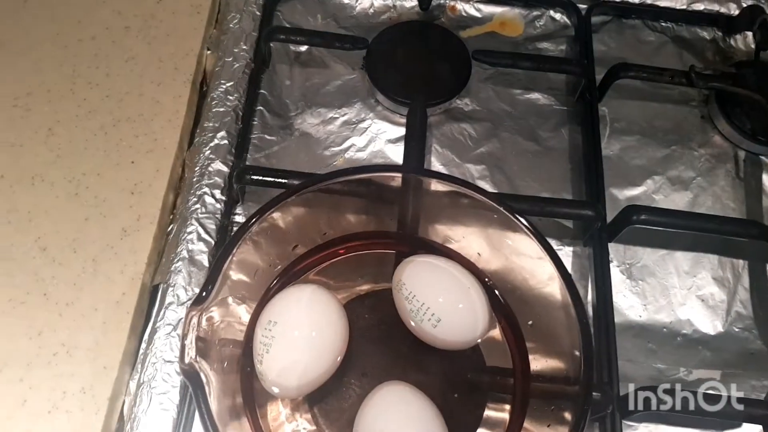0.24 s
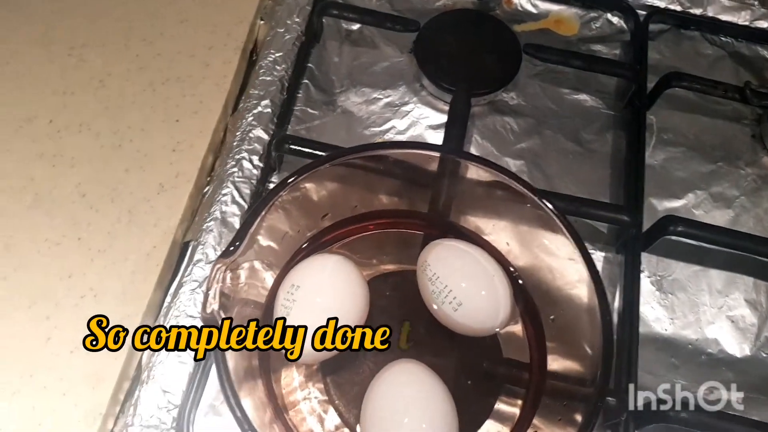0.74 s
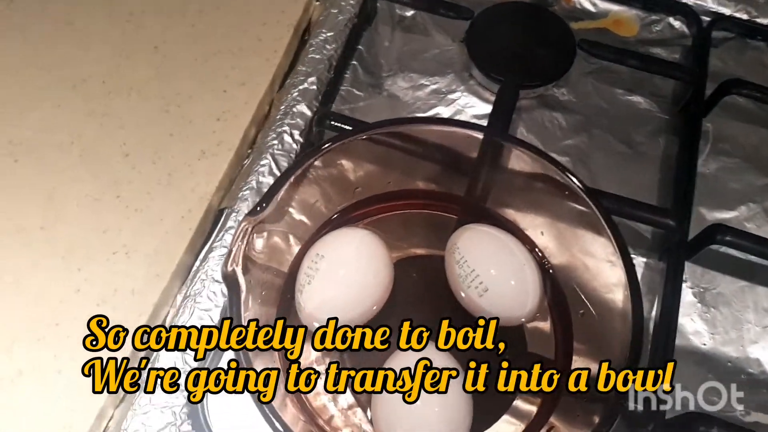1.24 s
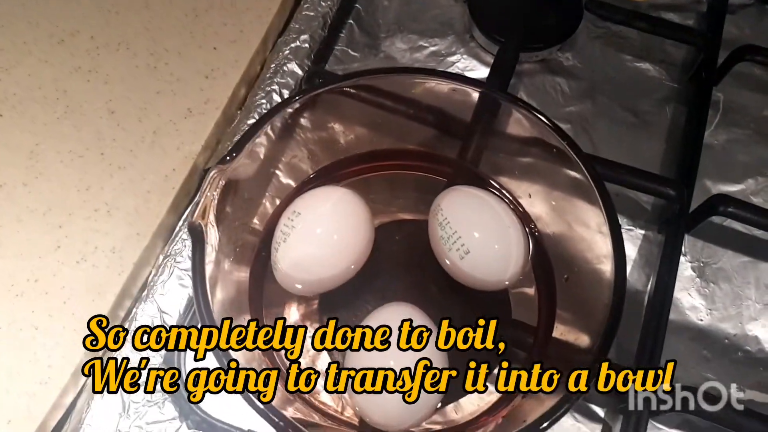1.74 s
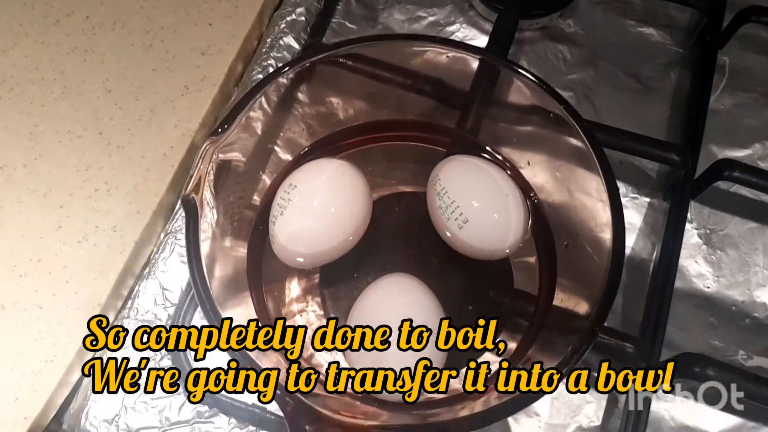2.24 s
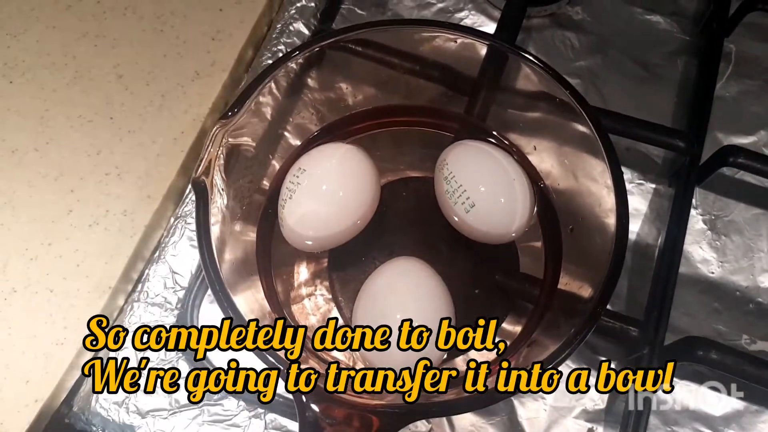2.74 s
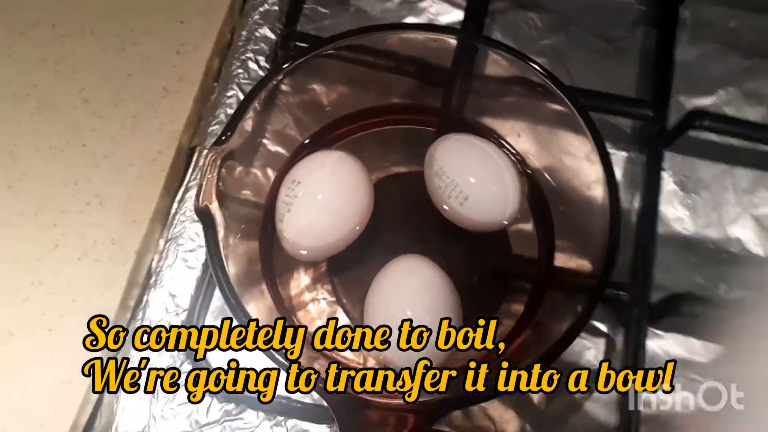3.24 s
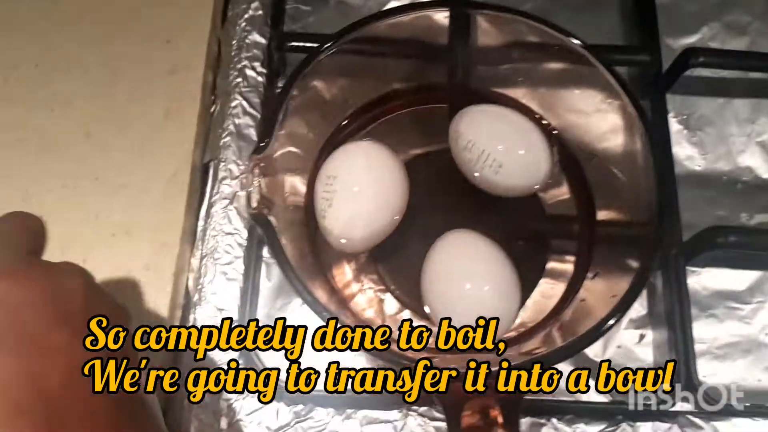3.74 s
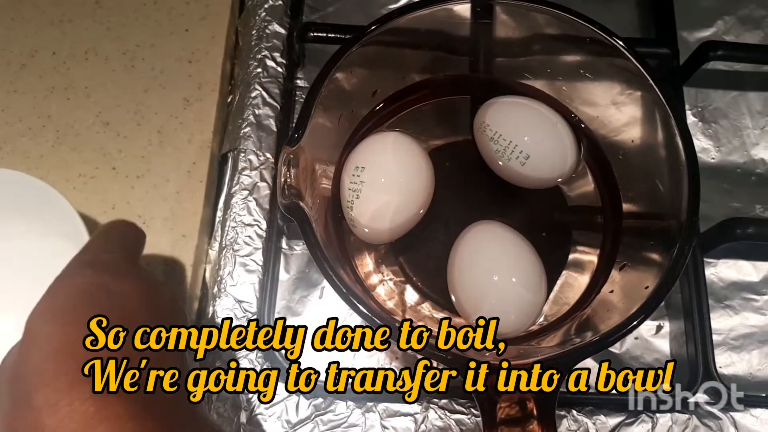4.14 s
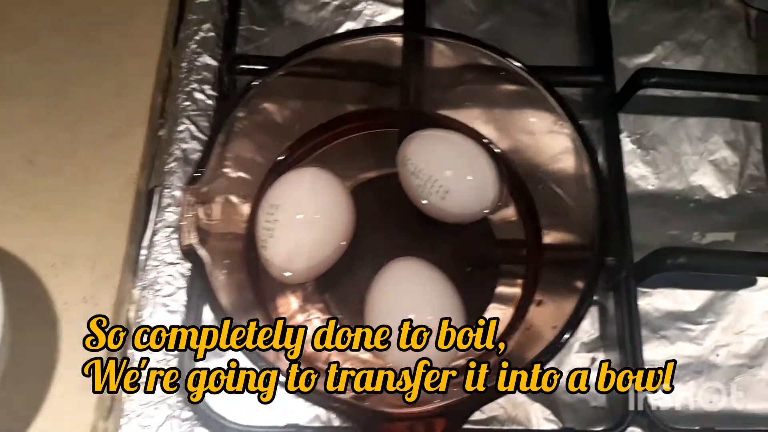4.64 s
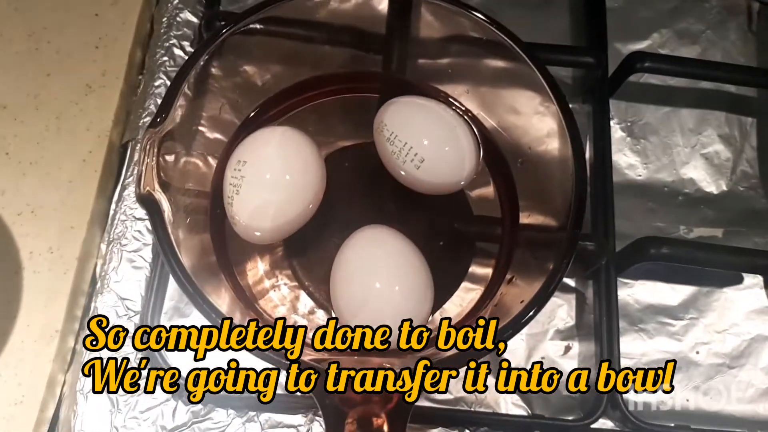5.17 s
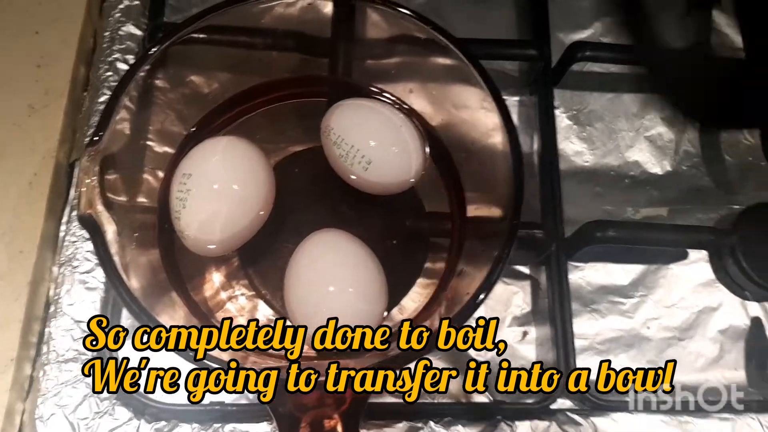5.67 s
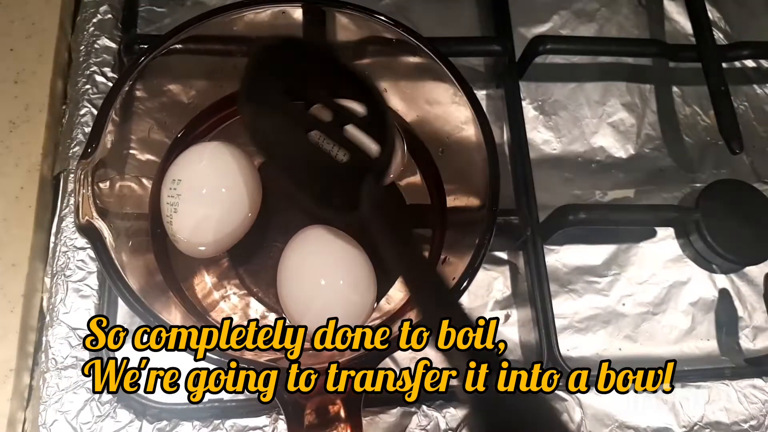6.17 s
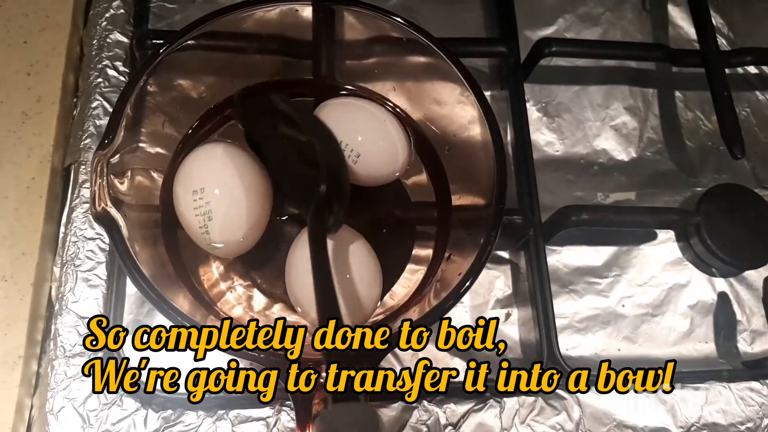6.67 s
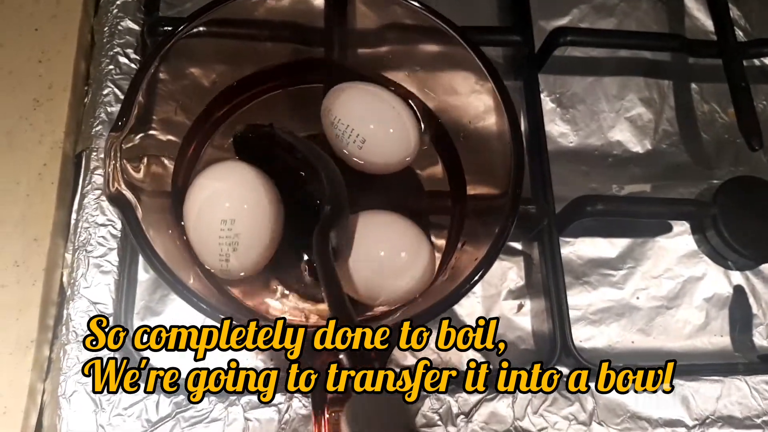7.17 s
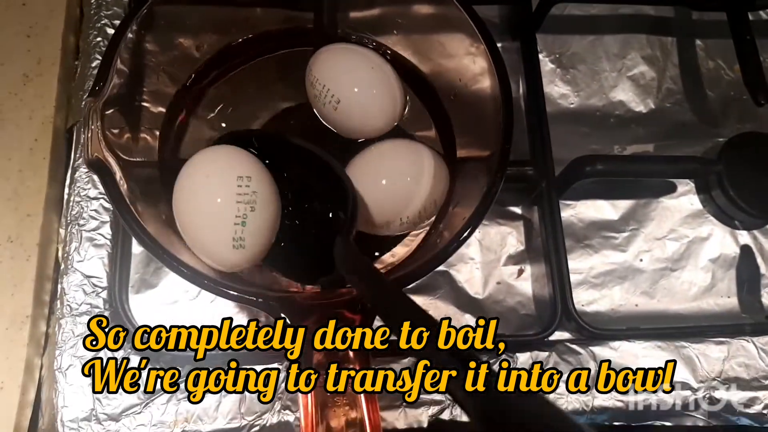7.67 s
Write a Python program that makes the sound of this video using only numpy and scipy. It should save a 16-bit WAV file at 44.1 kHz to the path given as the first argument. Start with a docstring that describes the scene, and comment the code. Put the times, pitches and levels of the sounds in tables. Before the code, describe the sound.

In a small kitchen with a humming fridge, china clinks on glass, a drawer thumps, a bowl lands, and a plastic spoon taps a glass pot.

```python
"""A humming fridge fills a small kitchen: pairs of low tones beat over shaped noise.
A bowl clinks against a glass lid, the lid is set down, a drawer shuts and the bowl lands in a few knocks.
A plastic slotted spoon is picked up, then taps and scrapes in a glass pot of water and nudges the eggs.
Blows are short pulses plus decaying modes, rubbing is a stream of slips, and water is rising bubble tones.
Reflections set how near each source stands to the stereo microphone."""
import sys
import numpy as np
from scipy import signal
from scipy.fft import rfft, irfft, next_fast_len
from scipy.io import wavfile

SR = 44100
rng = np.random.default_rng(int(sys.argv[2]) if len(sys.argv) > 2 else 0)


def transcribe(u):
    """Save the signal u as a 16-bit wav file named by the first command-line argument.

    u: samples, shape (n,) or (channels, n), limited to [-1, 1]; the rate is SR.
    q: integer samples, one column per channel.
    """
    v = np.clip(np.atleast_2d(u).T, -1, 1)
    q = np.round(v * 32767).astype(np.int16)
    wavfile.write(sys.argv[1], SR, q)


N = 348831
TIME = np.arange(N) / SR  # s
CUTOFF_HZ = 16000  # top of the microphone channel

# relative spectrum of plastic and drawer runners sliding: (frequency [Hz], level [dB])
SLIDE_COLOUR = [(200, -2), (700, 4), (1500, -5.5), (3000, -2), (5000, -6), (6700, 3.5), (8500, -15),
                (12000, -3.5), (16000, -9)]


def from_db(db):
    """Decibels to gain."""
    return 10 ** (np.asarray(db) / 20)


def rms_one(x):
    """Scale to unit rms."""
    return x / np.sqrt(np.mean(x ** 2) + 1e-20)


def at_hz(points, hz):
    """Read a table along a log-frequency axis."""
    table_hz, value = np.transpose(points)
    return np.interp(np.log(np.maximum(hz, 1)), np.log(table_hz), value)


def add(out, s, sound):
    """Mix a sound in at time s."""
    i = int(s * SR)
    out[..., i:i + sound.shape[-1]] += sound[..., :N - i]


def convolve(x, response):
    """Pass a sound through a stereo response."""
    return signal.fftconvolve(np.atleast_2d(x), response, axes=-1)[:, :N]


def panned(x, left_db):
    """Raise the left over the right by left_db; a negative value leans right."""
    return x * from_db([[left_db / 2], [-left_db / 2]])


def soften(x, hz):
    """A softer contact lasts longer and loses treble."""
    low_pass = signal.butter(2, min(hz, .45 * SR), fs=SR, output="sos")
    return signal.sosfilt(low_pass, x)


def diffuse(size):
    """Frequencies and spectrum of white stereo noise arriving from all sides."""
    # left-right likeness of diffuse sound: (frequency [Hz], correlation [-1 to 1])
    likeness = [(60, 1), (125, .92), (280, 0.98), (600, 0.15), (1300, -.15), (3000, -0.16), (16000, 0)]
    hz = np.arange(size // 2 + 1) * SR / size
    alike = np.clip(at_hz(likeness, hz), -1, 1)
    mid, side = rfft(rng.standard_normal((2, size)))
    shared = np.sqrt(1 + alike) * mid
    opposed = np.sqrt(1 - alike) * side * [[1], [-1]]
    return hz, (shared + opposed) / np.sqrt(2)


def pulse(colour, size=2048):
    """The shortest causal (minimum-phase) pulse with a given spectrum; unit energy."""
    hz = np.arange(size // 2 + 1) * SR / size
    cepstrum = irfft(np.log(from_db(at_hz(colour, hz))))
    # folding the cepstrum forward makes the pulse causal
    cepstrum[1:size // 2] *= 2
    cepstrum[size // 2 + 1:] = 0
    return rms_one(irfft(np.exp(rfft(cepstrum)))) / np.sqrt(size)


def kitchen(early_t60=0.19, late_db=-16.5, build_s=0.0017, size=32768, count=12):
    """Reflections only: echoes, quick scatter off nearby things and a late tail; unit energy per side."""
    # late kitchen reverberation: (frequency [Hz], t60 [s])
    room_t60 = [(100, 0.93), (400, 0.83), (1200, 0.82), (2500, 0.72), (5000, 0.6), (9000, 0.77),
                (16000, 0.33)]
    # echoes off wall and cupboards: (delay before random shift [s], level [dB])
    echoes = [(.0034, -13.5), (.0072, -13.5), (0.0101, -14.5)]
    hz, noise = diffuse(size)
    t = TIME[:size]
    centres = np.geomspace(100, CUTOFF_HZ, count)
    out = irfft(noise) * from_db(-60 * t / early_t60)
    # crossfading bands, each with its own decay
    for centre, share in zip(centres, np.eye(count)):
        band = irfft(noise * at_hz(np.c_[centres, share], hz))
        out += band * from_db(late_db - 60 * t / at_hz(room_t60, centre))
    out = rms_one(out * (1 - np.exp(-t / build_s))) / np.sqrt(size)
    for delay, db in echoes:
        side_delays = SR * delay * rng.uniform(.93, 1.07, 2)
        out[[0, 1], side_delays.astype(int)] += from_db(db)
    return rms_one(out) / np.sqrt(size)


def in_room(x, room, wet_db):
    """Direct sound plus reflections, scaled to about the same total power; wetter sounds more distant."""
    wet = from_db(wet_db)
    return (x + wet * convolve(x, room)) / np.sqrt(1 + wet ** 2)


def knocks(rows, colour):
    """The dead part of each blow: one pulse, dulled by its contact."""
    out, shape = np.zeros(N), pulse(colour)
    for s, db, contact_hz, *_ in rows:
        add(out, s, from_db(db) * soften(shape, contact_hz))
    return out


def rings(rows, modes, axis=3, split=0.00058, twin_db=-1.0):
    """Each blow rings all modes, by spot struck and a little chance; axis picks the level column."""
    chance_db = 1.2  # standard deviation of each mode's level
    hz, t60, *mode_db = np.transpose(modes)[:, :, None]
    t = TIME[:int(SR * min(2 * t60.max(), 2))]
    out = np.zeros((2, N))
    # each mode reaches the two sides a quarter cycle apart
    side_lead = np.pi / 4 * np.multiply.outer([1, -1], rng.choice([-1, 1], hz.shape))
    phase = 2 * np.pi * (hz * t + rng.random(hz.shape)) + side_lead
    # nothing is quite round: a twin, off by a small share of the pitch, beats with each mode,
    # swelling on one side as it fades on the other
    offset_hz = split * hz * rng.uniform(0.45, 1, hz.shape) * rng.choice([-1, 1], hz.shape)
    beat = 2 * np.pi * t * np.multiply.outer([1, -1], offset_hz)
    pair = np.sin(phase) + from_db(twin_db) * np.cos(phase + beat)
    partials = pair * from_db(-60 * t / t60) * (1 - np.exp(-hz * t))
    for row, chance in zip(rows, rng.standard_normal((len(rows), len(modes)))):
        s, _, contact_hz, _, spot, *_ = row
        spot_db = ((1 - spot) * mode_db[0] + spot * mode_db[-1]).ravel()
        strengths = from_db(spot_db + chance_db * chance)
        add(out, s, from_db(row[axis]) * soften(strengths @ partials + 1e-18, contact_hz))
    return out


def strokes(rows, rise_s, fall_db_per_s):
    """Gain of pushes of the hand: each builds up from its start and dies away after its length."""
    return sum(np.clip((TIME - s) / rise_s, 0, 1)
               * from_db(db - fall_db_per_s * np.clip(TIME - s - length, 0, 2))
               for s, length, db in rows)


def friction(push, colour, per_s, spread_db):
    """Rubbing is a stream of tiny slips of uneven size, as loud as the push is hard."""
    slips = (rng.random(N) < per_s / SR) * rng.standard_normal(N)
    slips = slips * from_db(spread_db * np.minimum(rng.exponential(1, N), 4))
    return push * rms_one(signal.fftconvolve(slips, pulse(colour))[:N])


def background():
    """Two fridge motors beat against each other over a low rumble and a faint hiss."""
    # fridge tones before the lean left: (frequency [Hz], rms level [dB])
    hum_tones = [(54.02, -60), (58.19, -51.5), (110.99, -64), (116.58, -63)]
    # relative spectrum of the room's noise: (frequency [Hz], level [dB])
    air_colour = [(25, -32), (40, -21.5), (60, -2.5), (80, -13.5), (115, -6.5), (150, -16.5), (280, -19.5),
                  (530, -24.5), (1000, -38.5), (2000, -53), (5000, -61), (8500, -67), (12500, -58),
                  (16000, -56.5)]
    crest_s = 6.9  # all tones crest together here
    rumble_db, hiss_db = -54, -75.5
    hum = sum(from_db(db) * np.sqrt(2) * np.cos(2 * np.pi * hz * (TIME - crest_s)) for hz, db in hum_tones)
    hz, noise = diffuse(2 * next_fast_len(N // 2 + 1))
    air = noise * from_db(at_hz(air_colour, hz))
    low = 1 / (1 + (hz / 1500) ** 4)  # crossover from rumble to hiss at 1500 Hz
    rumble = rms_one(irfft(air * low)[:, :N])
    hiss = rms_one(irfft(air * (1 - low))[:, :N])
    return panned(hum + from_db(rumble_db) * rumble, left_db=2.1) + from_db(hiss_db) * hiss


def lid_and_bowl():
    """Glass and china clink: knocks mostly off the walls, leaning left; rings more direct, leaning right."""
    # bowl against lid, then lid set down:
    # (time [s], knock level [dB], contact cut-off [Hz], lid ring level [dB], spot struck [0-1],
    #  bowl ring level [dB])
    clinks = [(.3797, 12, 8955, -19, 0.15, -15.5), (.3875, 4, 4930, -36, 0.51, -41.5),
              (2.0695, 0, 3380, -27, 0.09, -54), (2.0910, -2, 2940, -22.5, 0.06, -53),
              (2.1050, 1, 2910, -36.5, 0.73, -52.5), (2.2540, 8, 8460, -23.5, 0.72, -58)]
    # glass lid modes: (frequency [Hz], t60 [s], level at spot 0 [dB], level at spot 1 [dB])
    lid_modes = [(828, 0.065, -4.5, -17), (1382, 0.16, 2, -15), (1880, 0.21, -18, -14),
                 (3294, .15, 2.5, -16.5), (3600, 0.17, -5.5, -16.5), (3520, 0.32, 3.5, -14.5),
                 (3550, 0.31, -11, -5.5), (4430, 0.09, -10.5, -5), (6277, 0.2, -10.5, 2),
                 (8860, 0.092, -22.5, -22), (9690, 0.074, -19, -24), (12600, .13, -16.5, -29.5),
                 (13480, .17, -19, -27.5)]
    # china bowl modes: (frequency [Hz], t60 [s], level at any spot [dB])
    bowl_modes = [(1538, 1.755, -12), (1554.4, 0.27, -10), (3980, 0.41, -5.5), (7235, .24, -17),
                  (11100, 0.28, -15), (15730, 0.12, -9.5)]
    # relative spectrum of a clink's knock: (frequency [Hz], level [dB])
    clink_colour = [(60, -9), (150, -4.5), (400, -3), (800, -2), (1300, 0), (2100, 0.5), (2700, -10.5),
                    (3400, -6), (4400, -14), (5600, -28), (8000, -38), (16000, -52.5)]
    room = kitchen(early_t60=0.13, late_db=-18.0, build_s=0.002883)
    lid = rings(clinks, lid_modes, split=0.0033, twin_db=-3.5)
    bowl = rings(clinks, bowl_modes, axis=5, split=.0009, twin_db=-12.0)
    clatter = in_room(knocks(clinks, clink_colour), room, wet_db=16.5)
    ringing = in_room(lid, room, wet_db=-2.5) + in_room(bowl, room, wet_db=-8.0)
    return panned(clatter, left_db=2.5) + panned(ringing, left_db=-5.0)


def drawer():
    """A drawer's runners rub until it meets its stop across the room, heard almost all by reflection."""
    # drawer shutting: (time [s], knock level [dB], contact cut-off [Hz])
    stops = [(2.863, -17, 1800), (2.8895, -4.5, 3000), (2.913, -6.5, 2440)]
    # relative spectrum of the drawer's knock: (frequency [Hz], level [dB])
    drawer_colour = [(47, -45), (80, -14), (174, -9), (352, -4.5), (639, -8.5), (699, -7), (1500, -9.5),
                     (2520, -29), (6000, -40), (7800, -80), (13200, -120)]
    push_s, runners_db = 2.71, -65.5
    run = [(push_s, stops[-1][0] - push_s, runners_db)]
    push = strokes(run, rise_s=0.15, fall_db_per_s=350)
    runners = friction(push, SLIDE_COLOUR, per_s=11000, spread_db=5.0)
    room = kitchen(early_t60=0.14, late_db=-17.0)
    return in_room(knocks(stops, drawer_colour) + runners, room, wet_db=20.0)


def bowl_on_counter():
    """The bowl rocks onto its foot, left of centre: reflected thuds and nearer, mostly direct modes."""
    # bowl on the counter:
    # (time [s], knock level [dB], contact cut-off [Hz], ring level [dB], spot struck [0-1])
    landings = [(3.9846, 14, 2368, -31.5, 0), (4.1002, 8.8, 1880, -29, .5), (4.1945, 8, 3440, -23.5, 1),
                (4.2025, 11, 4370, -30.5, 1)]
    # modes of bowl and counter: (frequency [Hz], t60 [s], level at any spot [dB])
    counter_modes = [(149, .4, -10.5), (571, 0.2, -1.5), (792, 0.22, 0.5), (1125, 0.15, -4.5),
                     (1322, .16, 0), (1541, 1.77, -17.5), (1570, .18, 6), (1814, 0.18, -5),
                     (2100, 0.1, 0.5), (2645, 0.17, -11), (11480, 0.17, 4.5), (14100, 0.11, 3.5)]
    # relative spectrum of a landing's knock: (frequency [Hz], level [dB])
    landing_colour = [(60, -21), (140, -1.5), (260, -8.5), (500, -3), (900, -0.5), (1400, 1), (2000, -3),
                      (2800, -11.5), (3600, -23.5), (6800, -32), (9000, -50), (16000, -43.5)]
    room = kitchen(early_t60=0.11, late_db=-16.5, build_s=0.0048)
    thud = in_room(knocks(landings, landing_colour), room, wet_db=9.5)
    ringing = in_room(rings(landings, counter_modes, split=0.0012, twin_db=-4.5), room, wet_db=-8.5)
    return panned(thud + ringing, left_db=3.5)


def spoon_picked_up():
    """Plastic slides in a stream of slips, then clacks with a very short ring."""
    # spoon picked up:
    # (time [s], knock level [dB], contact cut-off [Hz], ring level [dB], spot struck [0-1])
    clacks = [(5.0745, 5.5, 15000, -40.5, 0.26), (5.0965, -4, 14000, -51, 0.2),
              (5.7938, 2, 15400, -31, 0.95)]
    # plastic spoon modes: (frequency [Hz], t60 [s], level at spot 0 [dB], level at spot 1 [dB])
    spoon_modes = [(560, 0.057, 8, -20), (786, 0.22, -4, -15), (973, 0.026, -29, 8.5),
                   (1766, 0.026, -27.5, -0.5), (2730, .07, -7, -9), (3230, 0.069, 4, -17)]
    # relative spectrum of a clack's knock: (frequency [Hz], level [dB])
    clack_colour = [(59, -33), (100, -3.5), (189, -13.5), (373, -4), (621, -9), (736, 0.5), (1060, -13.5),
                    (1480, -15.5), (2630, -16.5), (3470, -15), (6420, -9), (7940, -19.5), (11900, -13),
                    (16000, -11.5)]
    # spoon rubbing on the other utensils as it is gripped, tugged and drawn out:
    # (start [s], length [s], level [dB])
    slides = [(4.983, 0.081, -44.5), (5.057, 0.016, -37.5), (5.15, 0.55, -67.5)]
    room = kitchen(early_t60=0.11, late_db=-22.5, build_s=0.00058)
    push = strokes(slides, rise_s=0.0088, fall_db_per_s=261)
    slide = friction(push, SLIDE_COLOUR, per_s=10000, spread_db=3.0)
    clatter = in_room(knocks(clacks, clack_colour) + slide, room, wet_db=9.5)
    return clatter + in_room(rings(clacks, spoon_modes), room, wet_db=-10.0)


def spoon_in_pot():
    """Close taps and scraping on glass; the spot struck moves from wall (0) to bottom (1) as the spoon sinks."""
    # spoon and eggs on the pot: (time [s], knock level [dB], contact cut-off [Hz], ring level [dB])
    tap_blows = [(6.3010, -8.5, 5400, -56), (6.410, -23, 3530, -54.5), (6.419, -18, 2200, -63),
                 (6.6837, -13.5, 4270, -61), (6.733, -22.5, 9000, -60), (6.7996, -16, 4930, -68),
                 (6.849, -25, 15050, -69), (7.1876, -28, 4030, -77), (7.3805, -19.5, 5970, -54),
                 (7.529, -28, 3500, -70.5), (7.7994, -30, 14000, -65.5), (7.819, -40.5, 1800, -57.5)]
    # glass pot modes: (frequency [Hz], t60 [s], level at wall [dB], level at bottom [dB])
    pot_modes = [(777.5, 0.35, -4.5, -0.5), (899, 0.17, 8, -9), (1392, 0.28, 6.5, -18), (1530, 0.2, -3, -1),
                 (1857, 0.17, -3, -11), (2594, 0.064, -1, 2), (2740, 0.16, 0, -25), (4066, 0.11, 5, -20),
                 (4780, 0.19, -11, -11), (5900, 0.052, -25, 4.5)]
    # relative spectra of a tap's knock and of scraping: (frequency [Hz], level [dB])
    tap_colour = [(100, 7), (400, -3.5), (900, 5), (1600, 5), (2500, 0.5), (3300, -8), (4400, -9.5),
                  (7000, -7), (10000, -15), (16000, -0.5)]
    scrape_colour = [(180, -20), (300, -6), (416, -9), (559, -6), (1040, 0.5), (2400, -8), (3380, -20),
                     (7060, -31.5), (9030, -54), (15000, -42)]
    # spoon pushed along the glass; friction dies as it comes to rest: (start [s], length [s], level [dB])
    scrapes = [(6.472, .115, -44.5), (7.36, 0.029, -68.5)]
    # the spoon sinks from the wall above the water to the bottom of the pot
    sink_start_s, sink_length_s = 7.3, 0.18
    room = kitchen(early_t60=0.066, late_db=-19.0, build_s=0.00039)
    blows = [(*tap, np.clip((tap[0] - sink_start_s) / sink_length_s, 0, 1)) for tap in tap_blows]
    taps = in_room(knocks(blows, tap_colour), room, wet_db=5.5)
    ringing = in_room(rings(blows, pot_modes), room, wet_db=-5.0)
    push = strokes(scrapes, rise_s=0.058, fall_db_per_s=80.5)
    scrape = friction(push, scrape_colour, per_s=1000, spread_db=2.5)
    return panned(taps + ringing + in_room(scrape + water(), room, wet_db=6.5), left_db=3.0)


def water(count=400):
    """Low gulps at random times, as loud as the spoon's stirring, and a few bright drops."""
    # each push of the spoon stirs the water, which then settles: (start [s], length [s], level [dB])
    stirs = [(6.421, 0.44, -59.5), (6.743, 0.095, -54.5), (7.298, 0.25, -56.5)]
    # drops on the water: (time [s], level [dB], starting pitch [Hz])
    drop_rows = [(6.847, -39.5, 6730), (6.847, -43, 5960), (6.908, -45, 6340)]
    gulps, drops, start = np.zeros(N), np.zeros(N), stirs[0][0]
    for when, size, strength in rng.random((count, 3)):
        gulp = strength * bubble(175 * 2 ** (1.15 * size), cycles=6)
        add(gulps, start + when * (TIME[-1] - start), gulp)
    for s, db, hz in drop_rows:
        add(drops, s, from_db(db) * bubble(hz, cycles=24, rise=.06))
    stirring = strokes(stirs, rise_s=0.09, fall_db_per_s=31.5)
    return stirring * gulps / gulps[TIME > start].std() + drops


def bubble(hz, cycles, rise=0.097):
    """A pocket of air rings for some cycles, rising in pitch as it nears the surface."""
    age = TIME[:int(SR * cycles / hz)] * hz / cycles  # 0 to 1 over its life
    return from_db(-60 * age) * np.sin(2 * np.pi * cycles * age * (1 + rise * age / 2))


def scene():
    """Everything in the kitchen."""
    return background() + lid_and_bowl() + drawer() + bowl_on_counter() + spoon_picked_up() + spoon_in_pot()


def record(dry):
    """The top is cut steeply by an elliptic low-pass."""
    low_pass = signal.ellip(10, .2, 80, CUTOFF_HZ, fs=SR, output="sos")
    return signal.sosfilt(low_pass, dry)


dry = scene()
out = record(dry)
transcribe(out)
```